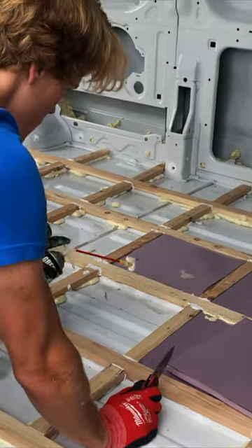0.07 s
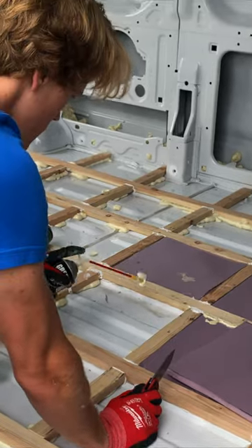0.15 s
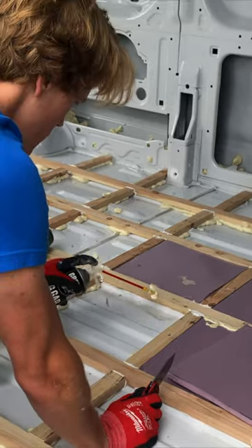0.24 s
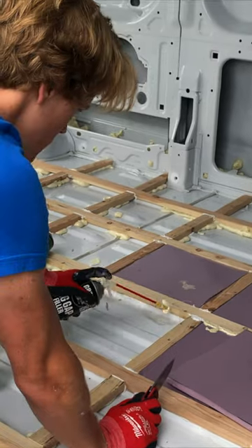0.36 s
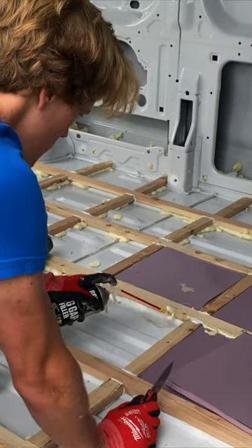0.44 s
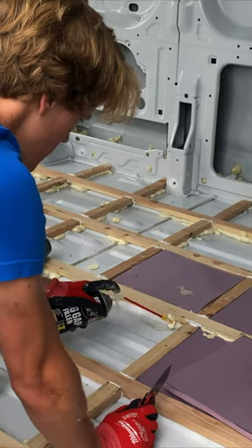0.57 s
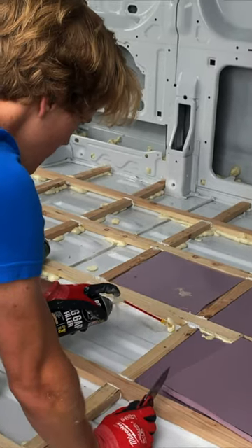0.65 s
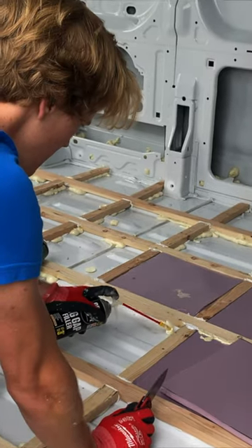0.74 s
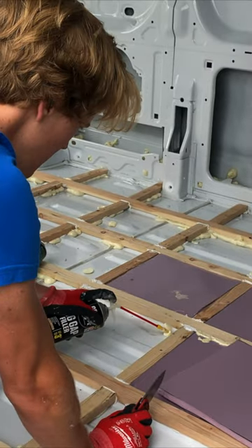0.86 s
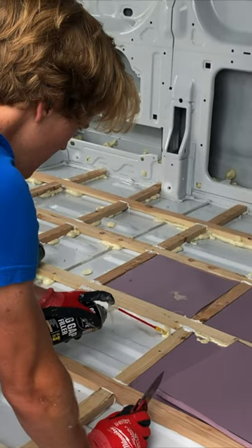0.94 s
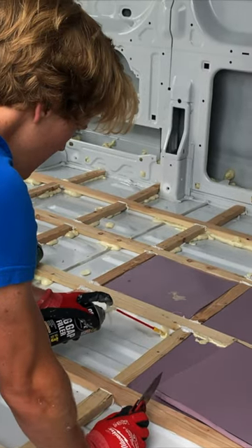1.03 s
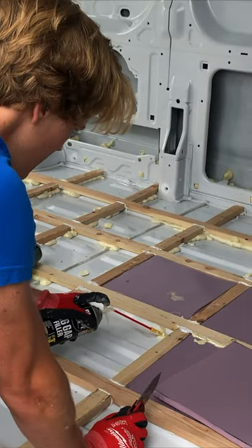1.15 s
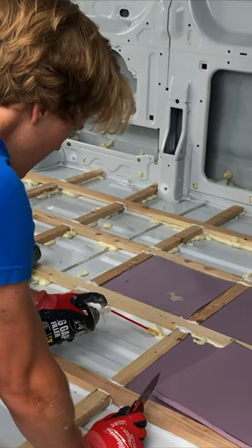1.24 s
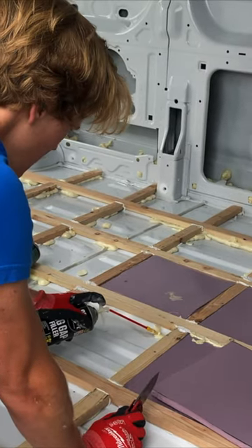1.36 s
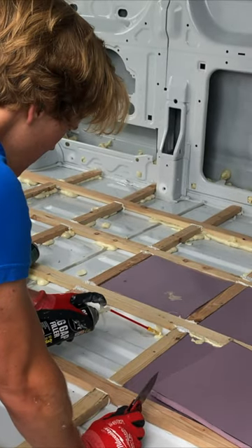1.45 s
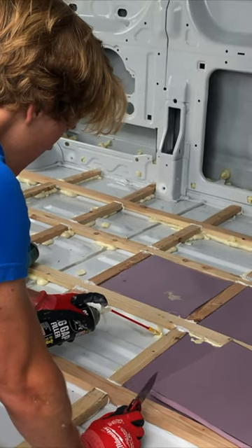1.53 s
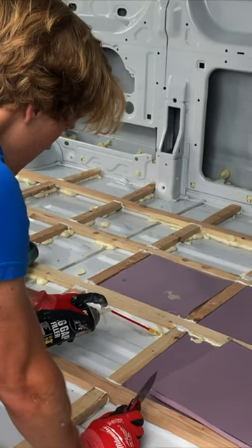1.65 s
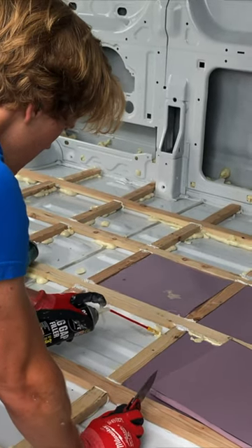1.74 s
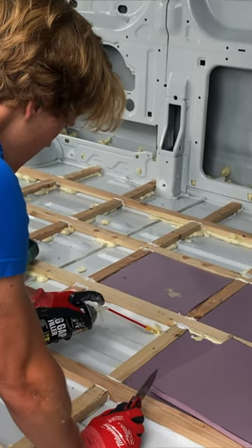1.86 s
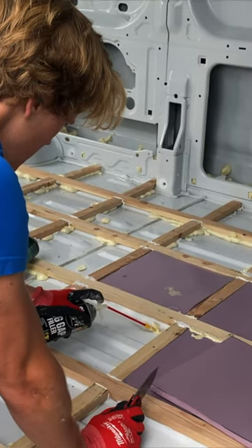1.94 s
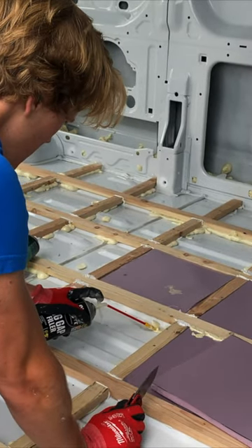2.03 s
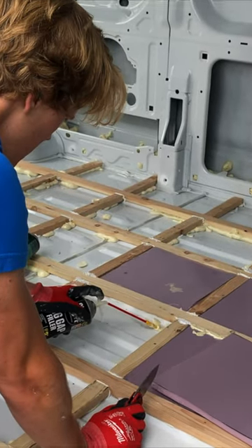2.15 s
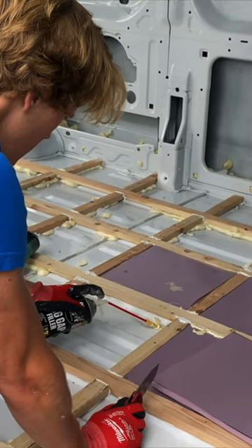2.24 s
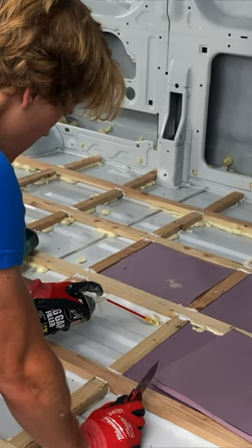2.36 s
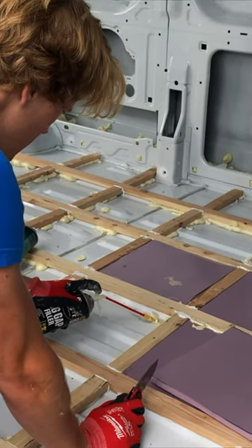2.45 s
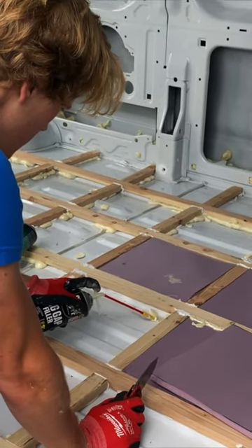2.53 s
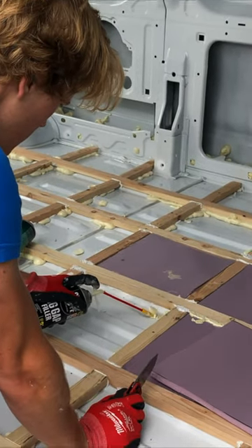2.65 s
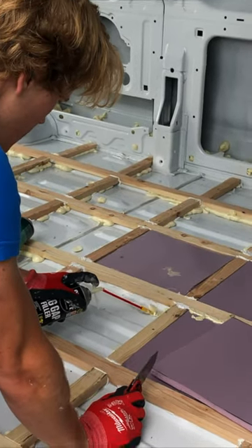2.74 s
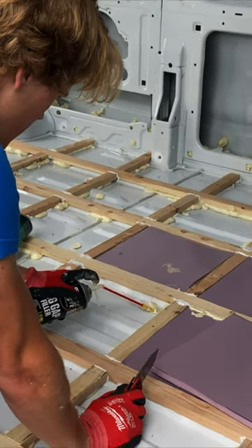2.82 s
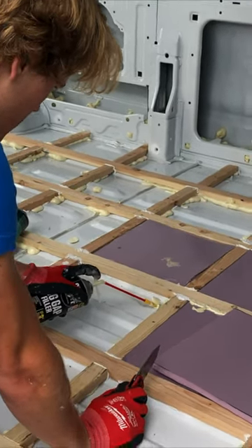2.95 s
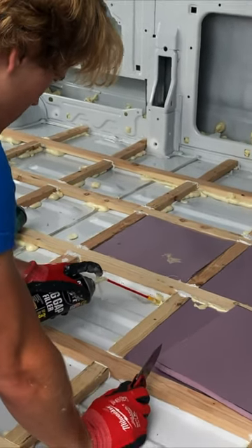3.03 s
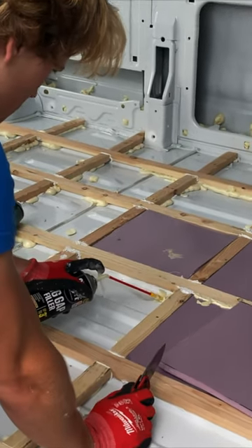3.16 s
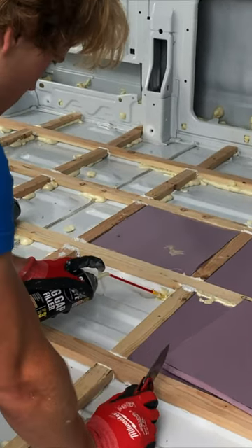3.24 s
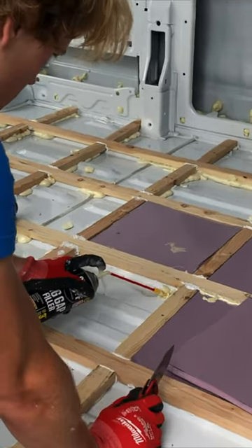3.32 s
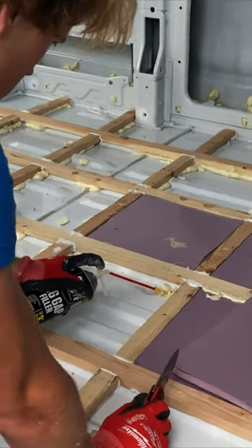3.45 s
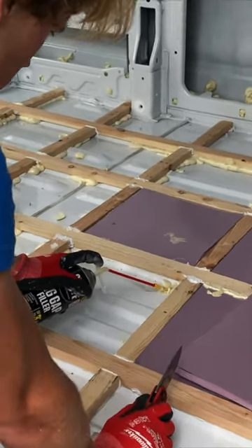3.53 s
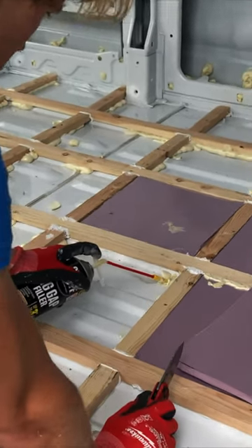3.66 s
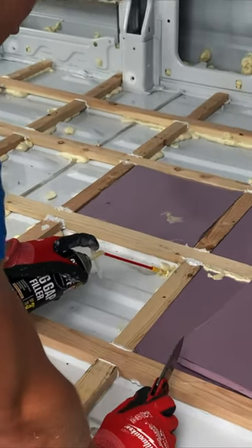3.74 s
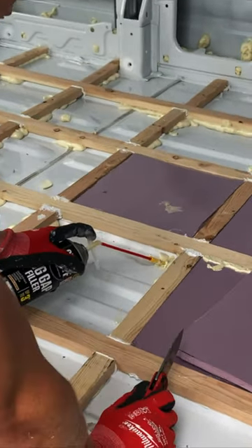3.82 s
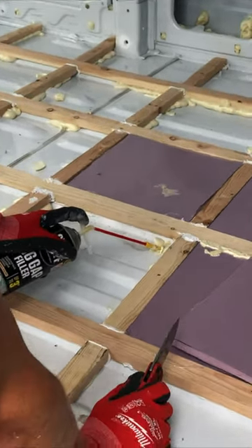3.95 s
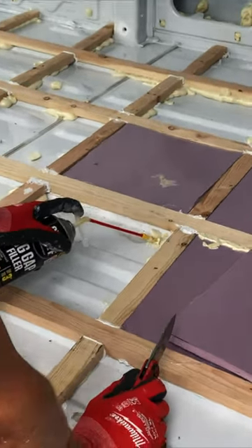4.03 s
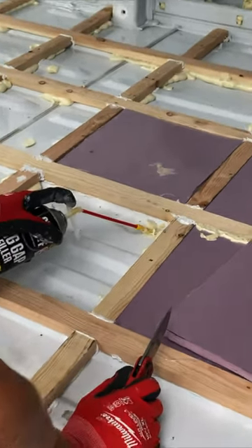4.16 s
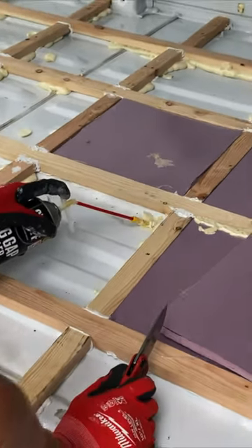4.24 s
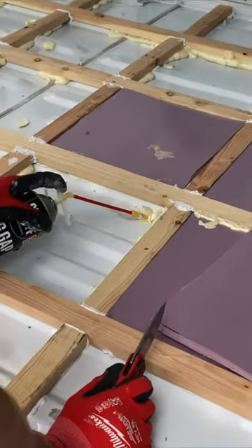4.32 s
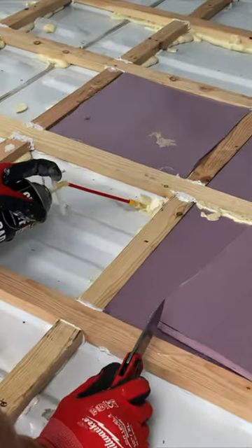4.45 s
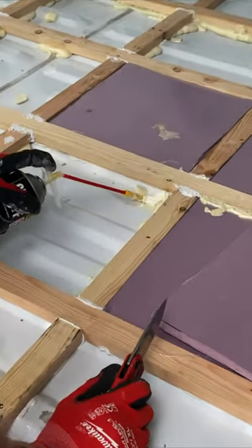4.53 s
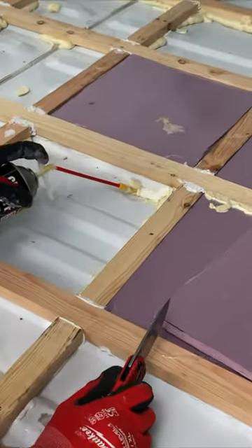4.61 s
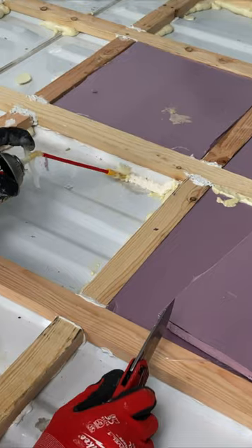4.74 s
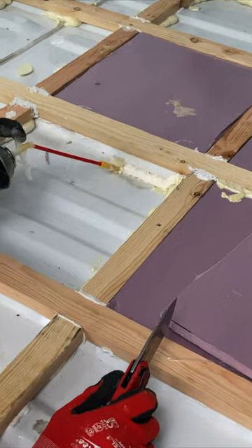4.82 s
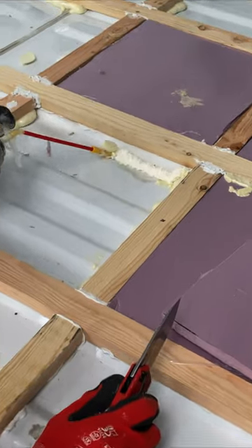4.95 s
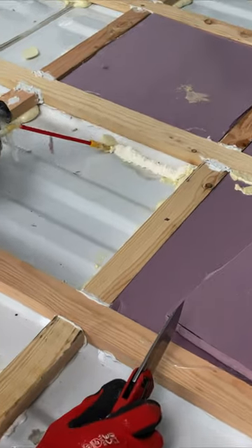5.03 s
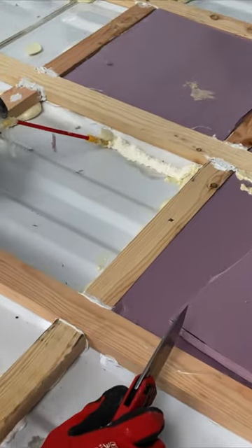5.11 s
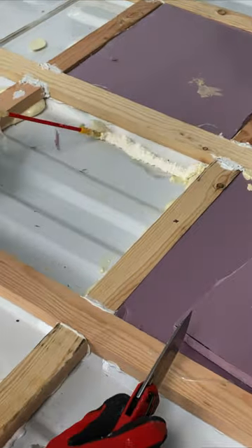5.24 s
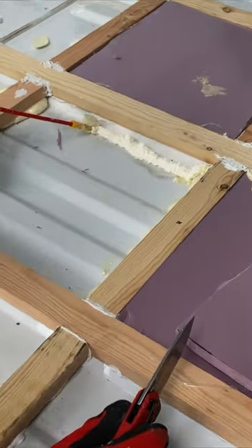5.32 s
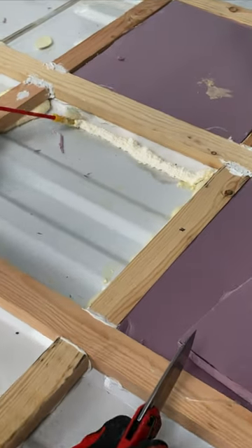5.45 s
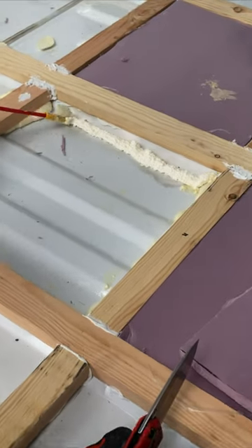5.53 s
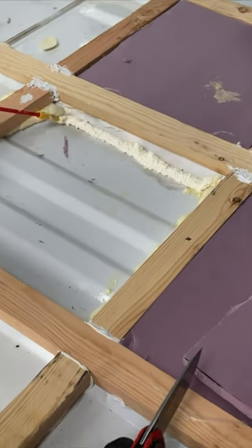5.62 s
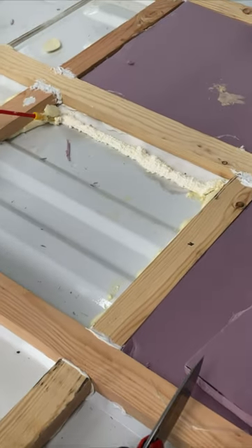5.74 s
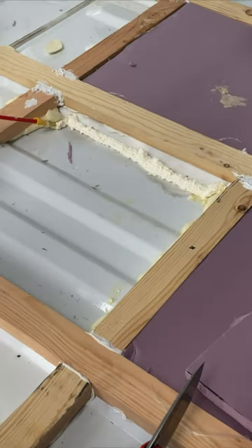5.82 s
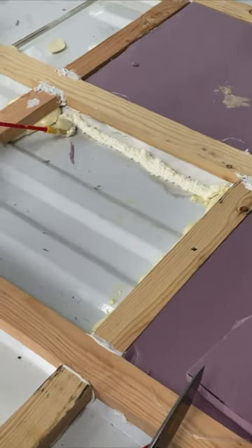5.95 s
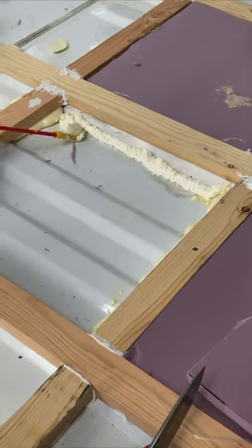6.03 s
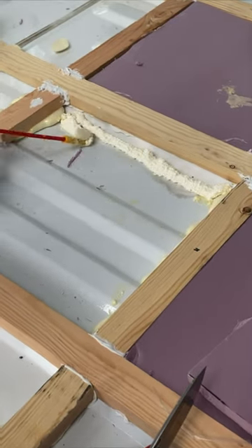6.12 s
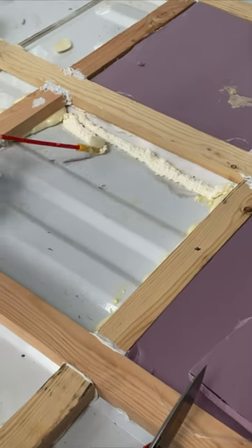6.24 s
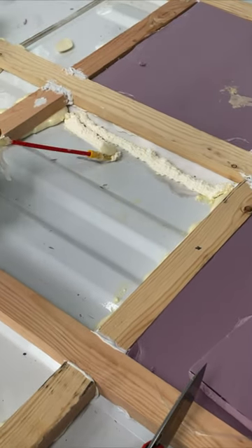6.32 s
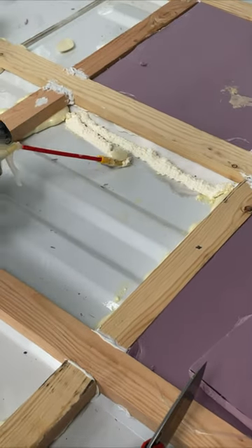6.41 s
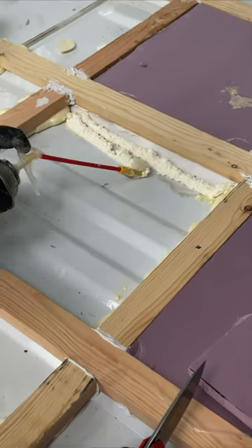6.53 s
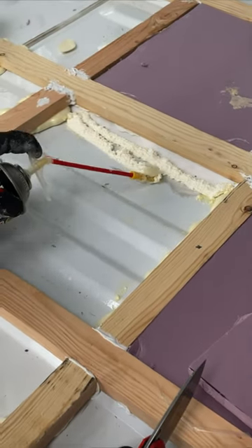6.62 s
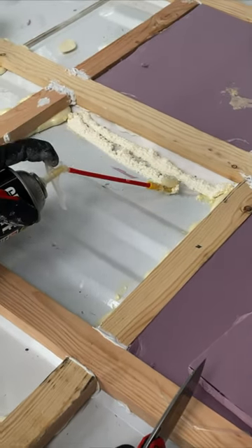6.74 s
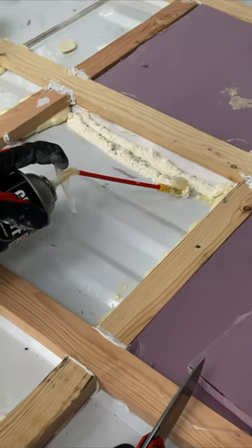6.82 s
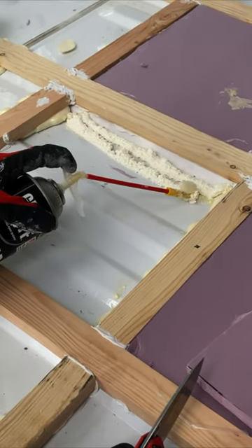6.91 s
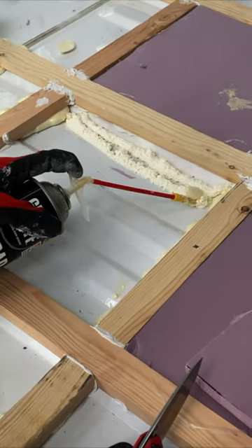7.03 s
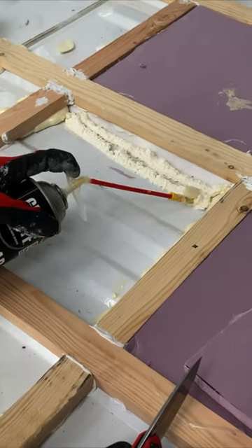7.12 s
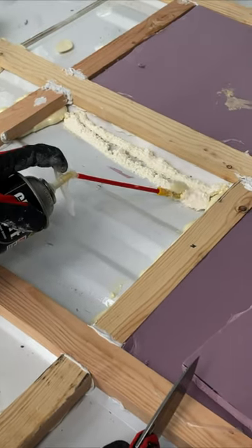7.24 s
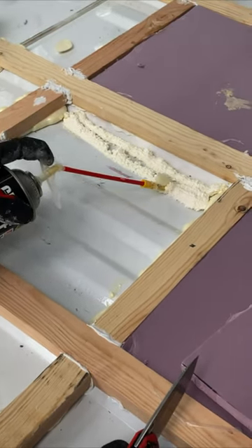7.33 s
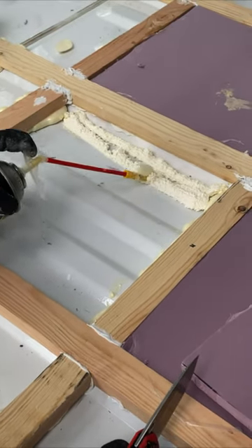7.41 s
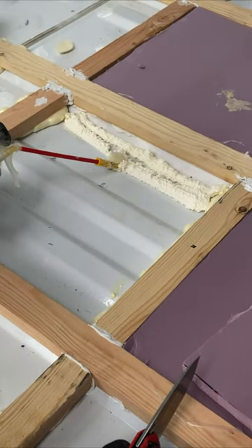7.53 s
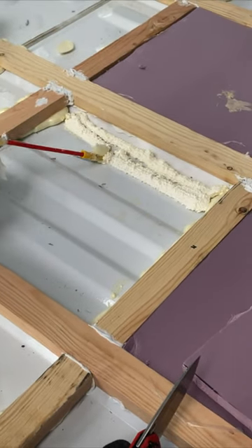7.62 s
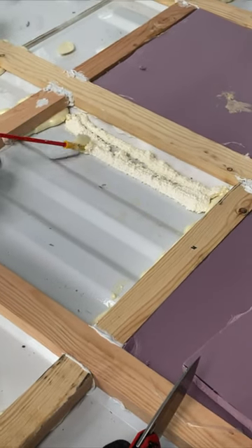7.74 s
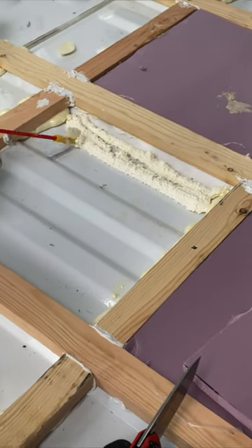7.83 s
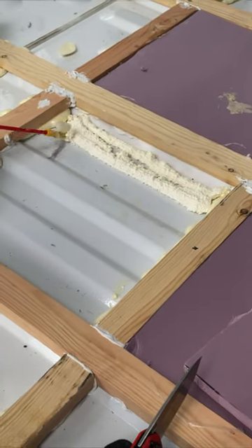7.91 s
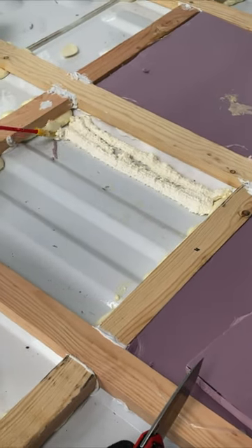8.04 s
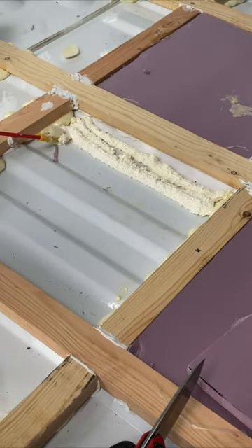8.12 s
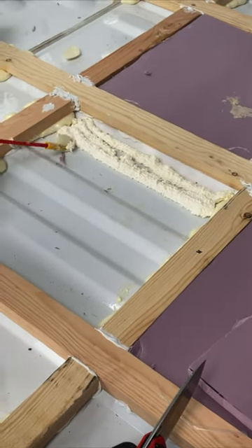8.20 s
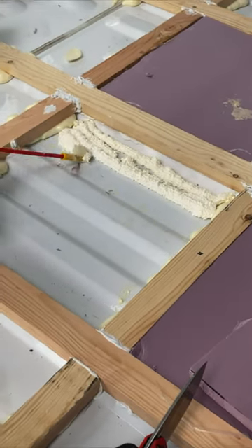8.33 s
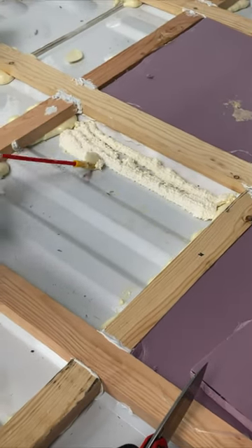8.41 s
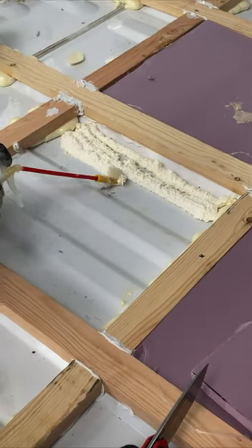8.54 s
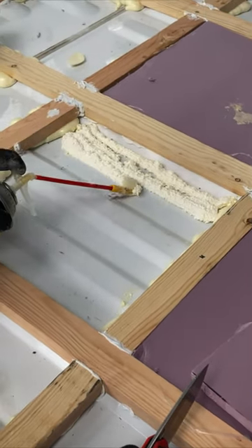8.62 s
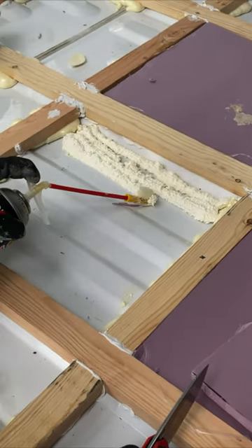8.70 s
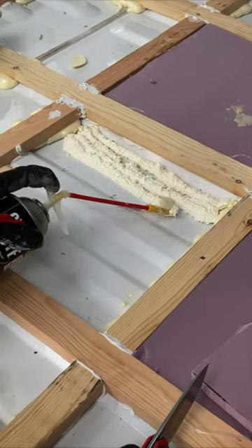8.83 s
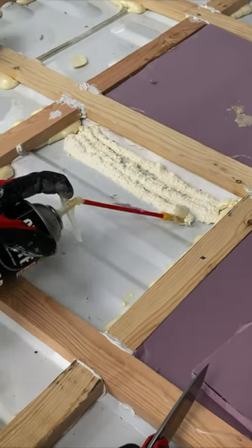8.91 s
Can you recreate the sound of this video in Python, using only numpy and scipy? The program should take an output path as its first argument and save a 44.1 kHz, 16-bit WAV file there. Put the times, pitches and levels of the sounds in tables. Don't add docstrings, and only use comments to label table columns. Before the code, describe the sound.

Close stereo sound inside an empty metal van: a quiet opening with a small knock, burry bird notes and far-off barks, then soft aerosol hiss through a thin straw. The flow weakens and crackles, then sharp plugs blow free past four seconds. From there thick foam gurgles and hisses strongly, repeatedly choking and spurting, with brief squeals and a tight bright echo.

```python
import sys
import numpy as np
from scipy import signal
from scipy.fft import rfft, irfft, next_fast_len
from scipy.io import wavfile
from scipy.ndimage import uniform_filter1d

SR = 44100
rng = np.random.default_rng(int(sys.argv[2]) if len(sys.argv) > 2 else 0)


def master(y):
    cut = np.clip(np.atleast_2d(y).T, -1, 1)
    pcm = np.round(cut * 32767)
    wavfile.write(sys.argv[1], SR, pcm.astype(np.int16))


def voltage_ratio(level):
    return 10 ** (np.asarray(level, float) / 20)


N = 395577
T = np.arange(N) / SR

# [t/s, flow level/dB, tip clear of foam/dB, lower straw resonances over upper/dB]
GAS = [(.93, -36, -2, 5), (1.17, -44, 2, 0), (1.65, -31.5, -1, 3), (2.2, -29.5, -2.5, 1.5),
       (2.64, -25.5, -12, 4), (3.0, -33.5, -13.5, 2.5), (3.35, -58, 2.5, -2), (3.77, -45.5, 7, -6),
       (4.13, -54, 5, -5), (4.26, -30.5, -7, 2.5), (5.02, -24, -5, 2), (5.75, -21, -7, 1),
       (6.17, -21.5, -17.5, 9.5), (6.6, -29, -16, 13.5), (7.5, -28, -7, 2.5), (7.95, -26, -8, 5.5),
       (8.33, -21.5, -9, -0.5), (8.97, -35, -10, 7.5)]
# [t/s, amount level/dB, tightness of the mouth/dB]
BEAD = [(.93, -68, 27.5), (1.65, -57.5, 8), (2.4, -57.5, 14), (2.6, -40, 5.5), (2.9, -49, 1),
        (3.5, -60.5, -2.5), (3.76, -45.5, 1.5), (4.0, -43.5, -1.5), (4.13, -35.5, 2.5), (4.45, -28, 5.5),
        (4.75, -29.5, -1), (5.03, -28, 2.5), (5.3, -31, -1), (5.75, -24.5, 0.5), (6.15, -29, -6),
        (6.4, -36.5, -3.5), (8.3, -36.5, -2.5), (8.97, -40.5, -2)]
STALLS = [(2.92, 0.73, 8, 4.5, 10.5), (3.93, 0.06, 4.5, 5, -2), (4.165, 0.047, -13.5, -1, 10),
          (4.62, 0.11, 15, 7, 10), (5.42, 0.43, 8.5, 3, -3), (5.956, 0.22, 15, 0.3, -6),
          (6.3, 0.13, 3.5, 3, -3.5), (6.422, 0.13, 7.5, 2, 2), (6.56, 0.28, -0.5, -1.5, -4.5),
          (6.82, 0.19, 8.5, 2.5, -2.5), (7.198, 0.36, 25, 3, -4.5), (7.301, 0.14, 9.5, 0.5, 7),
          (7.7, 0.11, -2, 0, -5), (7.88, 0.32, -2.5, 1, 1), (8.031, 0.08, 5.5, -0.5, -9),
          (8.129, 0.072, 24, 0, -6), (8.222, 0.086, 25.5, 1, -2), (8.5, 0.13, 2, 2.5, 1.5),
          (8.7, 0.39, 2, 3, -0.5)]
# [t/s, peak level/dB, gurgle over peak/dB, choke 0-1]
SPURTS = [(2.4657, -17.5, -4, 0.24), (3.537, -26, -17, 0), (3.727, -27, -15, .3), (3.813, -29, -12, .3),
          (3.857, -28, -12, 0.15), (4.089, -48, 14, 0.5), (4.145, -23, -25, 0.1), (4.212, -8, -17, 0.55),
          (4.5273, -16, 2, 0.7), (4.570, -8.5, -0.5, 0.4), (4.622, -5.5, -7, 0.3), (4.7252, -37, 21, 1),
          (4.284, -19, 6, 0.2), (4.349, -22, 13, 0.23), (4.759, -22, -2, 0.57), (4.817, -19, -14, 0.6),
          (4.8537, -17, 7, 0.65), (5.208, -15, 2, 0.5), (5.272, -12, -14, 0.35), (5.487, -19, -12, 0.46),
          (5.448, -16, -20, 0), (5.838, -16, -25, 0.05), (5.884, -27, -5, 0.55), (6.104, -13, -14, 0.35),
          (6.217, -16, -22, 0.47), (6.6084, -12, -10, 0.37), (6.637, -16, -7, 0.55), (6.924, -26, -16, 0.6),
          (7.208, -43, 19, 0), (7.3913, -33, -15, 0.57), (7.456, -10, -20, 0.35), (7.653, -13, -19, 0.26),
          (7.953, -11, -25, 0.33), (8.281, -40, -12, 0.37), (8.525, -6, -36, 0.56), (8.595, -11, -38, 0.62)]
# [t/s, swell/dB, half length/s]
GULPS = [(1.975, -5, 0.0017), (2.154, 1.5, 0.031), (2.244, 4.5, 0.016), (2.312, 2, 0.01),
         (2.468, 3, 0.0041), (2.733, 4.5, 0.013), (3.197, 1, 0.0038), (3.451, 8, 0.013),
         (4.015, 4.5, 0.005), (4.187, 3.5, 0.0042), (4.236, 1.6, 0.023), (4.71, 2, 0.0038),
         (4.829, 4, 0.0091), (4.904, 2.5, 0.013), (5.314, 6.5, 0.0062), (5.341, 4.5, 0.0056),
         (5.371, 2, 0.0066), (5.468, 2, 0.011), (5.492, 3, 0.0053), (5.941, 3.5, 0.0051), (6.09, 3, 0.006),
         (6.151, 5, 0.013), (6.202, 5.5, 0.0089), (6.223, 5.5, 0.0057), (6.283, 2.5, 0.0081),
         (6.333, 5, 0.006), (6.452, 2.5, 0.0085), (6.484, 4.5, 0.006), (6.551, 2.5, 0.0048),
         (6.59, -1.5, 0.0075), (6.613, 3, 0.011), (6.64, 2, 0.012), (6.848, 3.5, 0.013), (6.922, 7, 0.0046),
         (6.958, 4.5, 0.0059), (7.066, 4, 0.011), (7.242, 4.5, 0.01), (7.397, 0, 0.0062),
         (7.526, 3.5, 0.0096), (7.645, 2, 0.006), (7.691, 3, 0.006), (7.771, 6.5, 0.0068), (7.854, 2, 0.01),
         (8.01, 5.5, 0.007), (8.24, 4.5, 0.0041), (8.398, 6, 0.0071), (8.435, 4, 0.0059),
         (8.457, 4.5, 0.0056), (8.504, 3, 0.012), (8.645, 2, 0.0092), (8.756, 3.5, 0.0055),
         (8.827, 4, 0.012), (8.891, 5.5, 0.0053)]
# [t/s, level/dB]
DIVES = [(5.5, -29), (5.7, -25), (6.4, -16), (6.6, -14.5), (7.9, -15.5), (8.2, -20.5), (8.6, -12.5)]

# [f/Hz, level/dB per Hz]
GURGLE = [(520, -31), (640, -7), (800, -6), (1070, -1.5), (1400, 0), (1650, 0.5)]
# [f/Hz, level/dB per Hz]
HEAP = [(220, -2.5), (400, 12.5), (600, 8)]
# [f/Hz, level/dB per Hz]
MOUTH = [(1450, -39), (1700, 2.5), (2000, 6.5), (2300, 1), (2700, -2.5)]
# [f/Hz, level/dB per Hz]
THROAT = [(2300, -5.5), (2700, -2.5), (3350, 4), (4000, -4.5), (4500, 0)]
# [f/Hz, width/Hz, level/dB]
STRAW = [(4700, 640, -2), (5200, 600, -6), (5850, 450, -3), (6600, 450, 0), (7100, 400, -1),
         (7750, 500, -6)]
# [f/Hz, level/dB per Hz]
AIR = [(7300, -3.5), (8100, 2), (9500, -2.5), (10500, -5.5), (11700, -16.5), (12600, -18), (13600, -42),
       (14800, -18.5), (15500, -32)]

# [start t/s, end t/s, f/Hz, half width/Hz, gain/dB]
HOLLOWS = [(1.55, 3.2, 7110, 290, 6), (8.16, 8.6, 5600, 630, 2.5), (2.1, 4.3, 5500, 230, 6.5),
           (1.1, 2.4, 3140, 150, 6.5), (1.53, 2.4, 10100, 560, 4), (1.45, 3.6, 1590, 126, -13.5),
           (2.5, 3.0, 1180, 250, 6), (3.3, 3.5, 4400, 480, 9), (3.54, 3.8, 7830, 350, 9.5),
           (3.55, 3.67, 5800, 200, 9), (4.54, 4.62, 11300, 1200, -12), (4.2, 4.55, 7060, 270, 2),
           (4.7, 4.5, 4400, 490, 3), (4.3, 4.55, 1770, 580, -3), (4.75, 5.25, 2690, 170, 7.5),
           (4.7, 5.2, 1620, 360, 2.5), (4.85, 5.5, 5390, 300, 6.5), (5.0, 5.5, 6400, 740, 3.5),
           (5.55, 5.8, 6340, 260, 4), (5.74, 5.95, 1970, 200, 4), (5.85, 6.024, 4800, 230, 14),
           (6.0, 6.3, 6450, 820, 4.5), (6.17, 6.72, 2740, 350, -11), (6.35, 6.7, 1690, 400, 7),
           (6.05, 6.35, 5100, 310, -2), (7.75, 8.1, 3950, 210, 5.5), (6.75, 7.15, 4010, 350, 9.5),
           (6.72, 7.6, 5500, 450, 2), (7.2, 7.5, 1420, 350, 7.5), (7.3, 8.05, 6300, 600, 2),
           (7.5, 7.95, 6740, 270, 5.5), (7.6, 7.8, 3200, 230, 8.5), (7.95, 8.14, 3200, 290, 6.5),
           (7.7, 8.4, 1120, 186, 7), (8.3, 8.65, 6670, 560, 5), (8.5, 8.68, 2910, 270, -15),
           (8.81, 10, 4700, 330, 5.5), (7.55, 7.78, 1600, 260, 6.5), (5.7, 6.05, 760, 180, -6),
           (8.3, 8.55, 4980, 320, 4)]
# [start t/s, end t/s, f/Hz, gain/dB]
NULLS = [(1.65, 2.8, 2710, -10), (1.46, 2.4, 3234, -6), (2.25, 3.2, 2530, -17), (3.3, 4.2, 3520, -15),
         (4.5, 4.85, 4300, -18), (6.68, 7.3, 2480, -8), (6.65, 7.3, 3070, -7), (7.78, 7.93, 2880, -17),
         (7.4, 8.5, 3570, -14), (5.25, 5.5, 3340, -3), (3.55, 3.9, 3370, -6)]

# [t/s, peak level/dB, f/Hz, t60/s, crack level/dB]
POPS = [(0.073, -44, 1500, .005, 8), (.08, -14.5, 397, 0.0089, -18), (0.083, -13.5, 1200, 0.0042, -10),
        (0.087, -20.5, 190, 0.011, -40), (0.932, -27, 1180, 0.015, -10), (0.94, -38, 1090, .03, -18),
        (0.957, -25, 2140, 0.011, -20), (2.299, -22.5, 1780, 0.022, -13), (2.465, -29, 2000, 0.011, -1),
        (2.579, -41, 148.8, 0.039, -40), (3.21, -19, 820, 0.0052, -32), (3.224, -36, 940, 0.018, -20),
        (3.368, -33, 1110, 0.012, -8), (3.539, -17.5, 990, 0.007, -15), (3.656, -24.5, 1790, 0.021, -22),
        (3.735, -23, 1910, .006, -16), (3.816, -27, 1920, 0.011, -22), (3.858, -27, 1790, 0.0078, -28),
        (3.99, -22, 1810, 0.006, -28), (4.063, -39, 1750, .007, -18), (4.087, -22.5, 1820, 0.011, -12),
        (4.793, -16, 337, 0.013, -22), (4.908, -12, 510, 0.0067, -24), (5.487, -30, 152, 0.013, -35),
        (5.592, -25.5, 344, 0.0084, -35)]
# [f/Hz, level/dB per Hz]
SPIT = [(700, -2.5), (1100, 7), (2100, -1.5), (3000, -4.5)]
# [t/s, level/dB, f/Hz]
SQUEAKS = [(.932, -28, 2880), (.958, -29, 2880), (2.5, -33, 9300), (3.222, -42, 8500), (3.392, -40, 6780),
           (3.818, -35, 6800), (4.1, -39, 5030), (4.186, -29, 7000), (5.3, -25, 5300), (6.848, -23.5, 5200),
           (6.926, -21.5, 5800), (6.61, -26, 7500), (6.445, -31.5, 9300)]

# [f/Hz, left lead/rad]
PORTS = [(200, 0.2), (950, 0.64), (2580, 1.5), (3270, -2.5), (3800, -4.5), (6120, -4), (6980, -7),
         (8270, -10.5), (9600, -10.5), (11000, -11.5), (12800, -10.5)]
# [f/Hz, left over right/dB]
TILT = [(200, 1), (700, 8.5), (1200, 0.5), (3100, 5), (3800, -5), (5800, 20), (7200, -9.5), (9000, 7),
        (11000, -3), (12500, -0.5)]
# [f/Hz, t60/s]
VAN = [(300, 0.084), (2000, 0.039), (7000, 0.027), (12000, 0.03)]
# [f/Hz, level/dB]
WET = [(300, -4), (2000, -1), (5500, 3), (8500, -2), (11000, -10)]

# [start t/s, end t/s, from f/Hz, to f/Hz, level/dB]
CLEAR = [
    (0.15, 0.21, 2284, 2243, -37.5),
    (0.492, 0.499, 2650, 2900, -40),
    (0.539, 0.545, 2700, 2300, -35),
    (0.869, 0.94, 2365, 2500, -39.5),
    (0.91, 1.141, 2497, 2620, -39),
]
# [start t/s, end t/s, from f/Hz, to f/Hz, level/dB]
HOARSE = [
    (-.03, 0.06, 3094, 3210, -40),
    (-.03, 0.048, 3530, 3390, -54),
    (-.03, 0.035, 2790, 2900, -48),
    (0.115, 0.167, 3420, 3200, -52),
    (0.041, 0.091, 3344, 2814, -33.5),
    (0.483, 0.636, 2783, 2817, -40.5),
    (0.616, 0.828, 4750, 4780, -71),
]
WARBLE = [.011, 0.0307]
# [t/s, level/dB]
BARKS = [
    [(0.0, -34.5), (0.07, -36), (.13, -42.5), (.19, -52)],
    [(0.19, -51), (0.242, -29), (0.318, -23.5), (0.492, -46), (0.504, -35.5), (0.6, -58)],
    [(1.04, -68), (1.1, -32), (1.184, -18), (1.29, -31.5), (1.444, -42), (1.5, -51.5), (1.6, -57)],
]
# [pitch f/Hz, resonances [f/Hz, width/Hz, level/dB]]
MUZZLE = [
    (540, [(560, 92, -2.5), (835, 70, -0.5)]),
    (270.4, [(510, 28, 1.5), (807, 15.6, 8.5), (896, 160, -14)]),
    (204, [(444, 83, -10), (595, 27, 4), (820, 34, 0), (1025, 71, -10), (1495, 160, -17)]),
]

# [f/Hz, level/dB per Hz]
FLOOR = [(25, -38), (60, -16), (130, -6), (300, -6.5), (800, -14.5), (1500, -21), (2500, -19.5),
         (3500, -32), (5000, -36.5), (8000, -38.5), (11000, -87)]
# [t/s, level/dB]
RUSH = [(0, -56), (.87, -62.5), (1.2, -56.5), (1.7, -64), (3, -59), (4.2, -59), (6.3, -64), (7.3, -56),
        (8.97, -58)]
# [f/Hz, level/dB under a full-scale sound]
MASK = [(6500, -78), (8500, -51.5), (12000, -59.5), (13500, -45.5), (14800, -61)]

PRESS_S, OPEN_S = 0.898, 0.06
CLEAR_S, JET_LOSS = 0.084, 0.99
THROAT_DB, BY_FLOW, BY_JET, BY_MOUTH = -37.5, 0.34, 0.15, 0.41
FADE_S, FADE_SLOPE, BLOW_S = 0.011, 0.23, 0.00036
HOLLOW_EDGE_S, NULL_HZ = 0.02, 114
DRIFT, DRIFT_RATE = 0.032, 9.17
SPIT_DB, SPIT_S, KNOCK_HZ = -11, .022, 900
SQUEAK_S, SQUEAK_WARBLE = .008, 0.021


def unit(x):
    return x / np.sqrt(np.mean(x ** 2) + 1e-20)


def along(points, hz):
    f, v = np.transpose(points)
    return np.interp(np.log(hz + 1), np.log(f + 1), v)


def level(rows, column):
    rows = np.array(rows)
    return voltage_ratio(np.interp(T, rows[:, 0], rows[:, column], left=-120, right=-120))


def control(rows):
    s, *columns = np.transpose(rows)
    return [np.interp(T, s, c) for c in columns]


def wobble(rate, count=N):
    knots = rng.standard_normal(int(count * rate / SR) + 2)
    return np.interp(T[:count] * rate, np.arange(len(knots)), knots)


def filtered(x, response):
    m = next_fast_len(x.shape[-1] + 8192, True)
    return irfft(rfft(x, m) * response(np.fft.rfftfreq(m, 1 / SR)), m)[..., :x.shape[-1]]


def shape(points):
    closed = [(points[0][0] * .5, -120)] + list(points) + [(points[-1][0] * 1.5, -120)]
    return lambda f: voltage_ratio(along(closed, f))


def modes(table):
    return lambda f: sum((-1) ** k * voltage_ratio(db) * 1j * f * w / (c * c - f * f + 1j * f * w)
                         for k, (c, w, db) in enumerate(table))


def froth(response, patchy_db, grain_db, flutter_db):
    raw = rng.standard_normal(N) * voltage_ratio(grain_db * wobble(350) + flutter_db * wobble(35))
    f, _, z = signal.stft(raw, SR, nperseg=1024)
    field = uniform_filter1d(rng.standard_normal(z.shape), size=6, axis=0)
    field = uniform_filter1d(field, size=8, axis=1)
    z = z * voltage_ratio(patchy_db * unit(field)) * abs(response(f))[:, None]
    return unit(signal.istft(z, nperseg=1024)[1][:N])


def tail(seconds, t60):
    hz, t, z = signal.stft(rng.standard_normal((2, int(seconds * SR))), SR, nperseg=128)
    ir = signal.istft(z * voltage_ratio(-60 * t / t60(hz)[:, None]), SR, nperseg=128)[1]
    return ir / np.linalg.norm(ir, axis=1, keepdims=True)


def foam():
    high, low, gate = plugs()
    flow_db, clear_db, opening_db = control(GAS)
    bead_db, tight_db = control(BEAD)
    gas_loss, foam_loss, throat_loss = stalls()
    hiss_db = flow_db - gas_loss
    jet_db = flow_db + clear_db - JET_LOSS * gas_loss
    bead_db = bead_db - foam_loss
    throat_db = THROAT_DB - throat_loss + BY_FLOW * (hiss_db + 33.5)
    throat_db += BY_JET * (jet_db + 40.5) + BY_MOUTH * (bead_db + tight_db + 38.5)
    hiss = voltage_ratio(hiss_db)
    push = 1 + high / (hiss + 1e-4)
    tilt = voltage_ratio(opening_db / 2)
    heaped = voltage_ratio(control(DIVES)[0])
    lower, upper = modes(STRAW[:2]), modes(STRAW[2:])
    lower_straw = lambda f: lower(f) / (1 + (3550 / (f + 1)) ** 8)
    upper_straw = lambda f: upper(f) / (1 + (5200 / (f + 1)) ** 8)

    out = (voltage_ratio(bead_db) + low) * froth(shape(GURGLE), patchy_db=0.5, grain_db=2.0, flutter_db=1.0)
    out += heaped * voltage_ratio(bead_db) * froth(shape(HEAP), patchy_db=1.6, grain_db=1.5, flutter_db=1.5)
    out += (voltage_ratio(bead_db + tight_db) + low) * froth(shape(MOUTH), patchy_db=0.2, grain_db=2.0, flutter_db=2.5)
    out += push * voltage_ratio(throat_db) * froth(shape(THROAT), patchy_db=1.74, grain_db=1.5, flutter_db=0.5)
    out += push * hiss * tilt * voltage_ratio(-6.5) * froth(lower_straw, patchy_db=1.54, grain_db=3.0, flutter_db=0.2)
    out += push * hiss / tilt * voltage_ratio(-2.0) * froth(upper_straw, patchy_db=2.5, grain_db=3.0, flutter_db=1.14)
    out += push * voltage_ratio(jet_db) * froth(shape(AIR), patchy_db=3.0, grain_db=3.0, flutter_db=1.3)
    trigger = np.clip((T - PRESS_S) / OPEN_S, 0, 1)
    return trigger * gate * voltage_ratio(0.51 * wobble(55)) * out


def stalls():
    t = T[::32]
    losses_db = sum(np.outer(depths_db, np.interp(t, [s - build, s, s + CLEAR_S], [0, 1, 0]))
                    for s, build, *depths_db in STALLS)
    return [np.interp(T, t, loss_db) for loss_db in losses_db]


def plugs():
    high, low, gate = np.zeros(N + SR), np.zeros(N + SR), np.ones(N + SR)
    t = np.arange(SR // 8) / SR
    for s, db, gurgle_db, choke in SPURTS:
        fade = np.clip(FADE_S * voltage_ratio(-FADE_SLOPE * (db + 24.0)), .004, .06)
        puff = (1 - np.exp(-t / BLOW_S)) * np.exp(-t / fade)
        at = round(s * SR)
        high[at:][:len(t)] += voltage_ratio(db - 17) * puff
        low[at:][:len(t)] += voltage_ratio(db + gurgle_db - 18) * puff
        gate[at - len(t):at] *= 1 - np.clip(choke, 0, .95) * np.exp(-(t[::-1] / 0.02) ** 2)
    return high[:N], low[:N], gate[:N]


def gulps():
    db = np.zeros(N)
    for s, swell_db, half in GULPS:
        near = slice(round((s - .06) * SR), round((s + .06) * SR))
        db[near] += swell_db * np.exp(-((T[near] - s) / max(half, .002)) ** 2)
    return voltage_ratio(db)


def hollowed(x):
    f, t, z = signal.stft(x, SR, nperseg=512)
    colour_db = np.zeros(z.shape)
    nulls = [(start, end, hz, NULL_HZ, db) for start, end, hz, db in NULLS]
    for start, end, hz, width_hz, gain_db in list(HOLLOWS) + nulls:
        lasting = np.clip(np.minimum(t - start, end - t) / HOLLOW_EDGE_S + .5, 0, 1)
        on = lasting > 0
        knots = rng.standard_normal(100)
        drift = np.interp((t[on] - start) * DRIFT_RATE, np.arange(len(knots)), knots)
        centre = hz * (1 + DRIFT * drift)
        colour_db[:, on] += gain_db * lasting[on] * np.exp(-((f[:, None] - centre) / width_hz) ** 2)
    return signal.istft(z * voltage_ratio(colour_db), nperseg=512)[1][:N]


def pops():
    out, t = np.zeros(N + SR), np.arange(SR // 12) / SR
    for s, db, hz, t60, crack_db in POPS:
        tone = np.sin(2 * np.pi * hz * (t + 0.0011 * (1 - np.exp(-t / 0.0053))))
        ring = voltage_ratio(-60 * t / t60) * (1 - np.exp(-t / .0008)) ** 2
        ring /= ring.max()
        spray = unit(uniform_filter1d(rng.standard_normal(len(t)), size=10))
        spray *= 0.092 * voltage_ratio(-60 * t / (4 * t60)) * (1 - np.exp(-t / 0.0014))
        crack = np.convolve(rng.standard_normal(len(t)), [1, 2, 2, 1, -1, -2, -2, -1])[:len(t)] / 3
        crack *= voltage_ratio(crack_db - 60 * t / .008)
        out[round((s + .001) * SR):][:len(t)] += voltage_ratio(db + 1) * (tone * (ring + spray) + crack)
    return filtered(out[:N], lambda f: (1j * f / (90 + 1j * f)) ** 3)


def spits():
    out, t = np.zeros(N), T[:SR // 8]
    for s, db, hz, *_ in POPS:
        if hz > KNOCK_HZ and s > PRESS_S:
            droplets = rng.standard_normal(len(t)) * voltage_ratio(5.6 * wobble(350, count=len(t)))
            spray = unit(filtered(droplets, shape(SPIT)))
            out[round(s * SR):][:len(t)] += voltage_ratio(db + SPIT_DB) * np.exp(-t / SPIT_S) * spray
    return out


def squeaks():
    out, t = np.zeros(N), T[:SR // 16]
    for s, db, hz in SQUEAKS:
        turns = np.cumsum(hz * (1 + SQUEAK_WARBLE * wobble(500, count=len(t)))) / SR
        whistle = np.exp(-(t / SQUEAK_S - 1.5) ** 2) * np.sin(2 * np.pi * turns)
        out[round((s - SQUEAK_S) * SR):][:len(t)] += voltage_ratio(db) * whistle
    return out


def ports(x):
    half = lambda f: np.exp(.5j * along(PORTS, f)) * voltage_ratio(along(TILT, f) / 2)
    return filtered(x, lambda f: np.array([half(f), 1 / half(f)]))


def van(x):
    hop = SR // 8
    out, x = np.zeros((2, N + 3 * hop + SR)), np.pad(x, (hop, 2 * hop))
    for k in range(0, N + hop, hop):
        part = x[k:k + 2 * hop] * np.sqrt(np.hanning(2 * hop))
        wet = signal.fftconvolve(part[None], tail(.08, lambda f: along(VAN, f)), axes=1)
        out[:, k + 90:][:, :wet.shape[1]] += wet
    return filtered(out[:, hop:][:, :N], lambda f: voltage_ratio(along(WET, f)))


def bird():
    out, t = np.zeros(N), T[:2 * SR]
    for notes, warble in zip((CLEAR, HOARSE), WARBLE):
        for start, end, from_hz, to_hz, db in notes:
            u = np.clip((t - start) / (end - start), 0, 1)
            hz = (from_hz + (to_hz - from_hz) * u) * (1 + warble * wobble(400, count=len(t)))
            swell = abs(np.sin(np.pi * u)) ** 0.41 * (u < 1)
            out[:len(t)] += voltage_ratio(db + 2.0) * swell * np.sin(2 * np.pi * np.cumsum(hz) / SR)
    yard = signal.oaconvolve(out[None], tail(0.96, lambda f: 0.5 + 0 * f), axes=1)[:, :N]
    return voltage_ratio(-1) * out * [[1], [.3]] + voltage_ratio(-0.5) * yard


def dog():
    out, n = np.zeros((2, N)), 2 * SR
    distance = [(300, -10), (430, -5.5), (2200, -9.0), (2800, -36)]  # f/Hz, level/dB
    for rows, (pitch_hz, throat) in zip(BARKS, MUZZLE):
        turns = np.cumsum(pitch_hz * (1 + 0.043 * wobble(29.92, count=n))) / SR
        pulses = unit(np.diff(np.floor(turns), prepend=0))
        source = pulses + 2.8 * rng.standard_normal((2, n))
        voice = filtered(source, lambda f: modes(throat)(f) * voltage_ratio(along(distance, f)))
        out[:, :n] += level(rows, 1)[:n] * unit(voice)
    return np.array([voltage_ratio(1.5) * out[0], -voltage_ratio(-4) * (0.36 * np.roll(out[0], 3) + 1.0 * out[1])])


def outdoor_rush():
    apart = lambda f: shape(FLOOR)(f) * voltage_ratio(along([(150, -8), (400, 0)], f))
    a = froth(shape(FLOOR), patchy_db=1.5, grain_db=.3, flutter_db=.8)
    b = froth(apart, patchy_db=1.5, grain_db=.3, flutter_db=.8)
    return level(RUSH, 1) * voltage_ratio(1.5) * np.array([a + 0.81 * b, a - 0.38 * b])


def thinned(x):
    f, _, z = signal.stft(np.array([x[0] + x[1], x[0] - x[1]]) / 2, SR, nperseg=2048)
    power = abs(z[:, :1024]) ** 2
    bands = power.reshape(2, 64, 16, -1).mean(2).repeat(16, axis=1)
    whim = 6 * uniform_filter1d(rng.standard_normal((64, z.shape[2])), size=3, axis=1).repeat(16, axis=0)
    whole_db = 10 * np.log10(2 * power.sum(1).mean(0) + 1e-12)
    treble = power[0, 350:].sum(0)
    sudden = (treble > 60 * np.roll(treble, 2)) & (treble > 8 * np.roll(treble, -3))
    weakest = voltage_ratio(along(MASK, f[:1024])[:, None] + .8 * whole_db + whim) ** 2
    z[:, :1024] *= (bands > weakest) | sudden
    mid, side = signal.istft(z, nperseg=2048)[1][:, :N]
    return np.array([mid + side, mid - side])


def scene():
    jet = hollowed(gulps() * foam())
    bursts = pops() + spits() + squeaks()
    can = ports(jet + bursts) + van(jet + voltage_ratio(-8.0) * bursts)
    return voltage_ratio(-3.0) * can + bird() + dog() + outdoor_rush()


def low_pass(x):
    return signal.sosfilt(signal.butter(12, 16470, fs=SR, output="sos"), x)


def record(dry):
    heard = filtered(dry, lambda f: (1j * f / (60 + 1j * f)) ** 2 * (f < 15600))
    heard = heard / (1 + abs(heard / 1.1) ** 3) ** (1 / 3)
    return low_pass(thinned(heard))


dry = scene()
out = record(dry)
master(out)
```